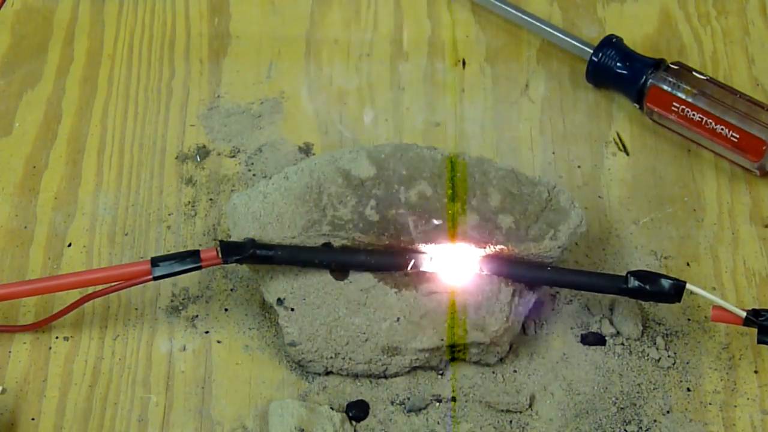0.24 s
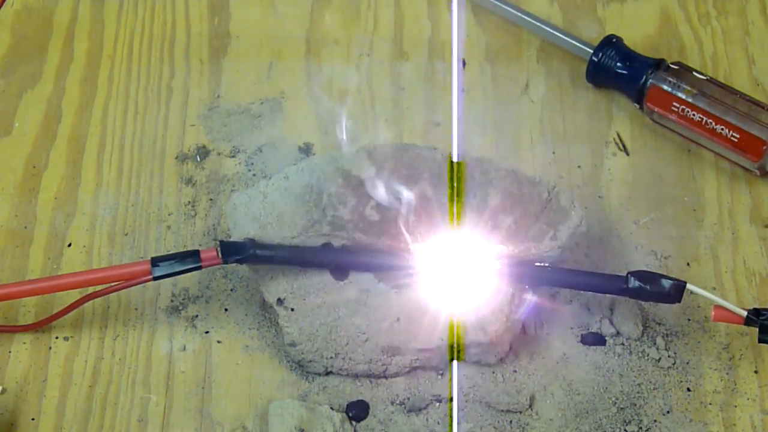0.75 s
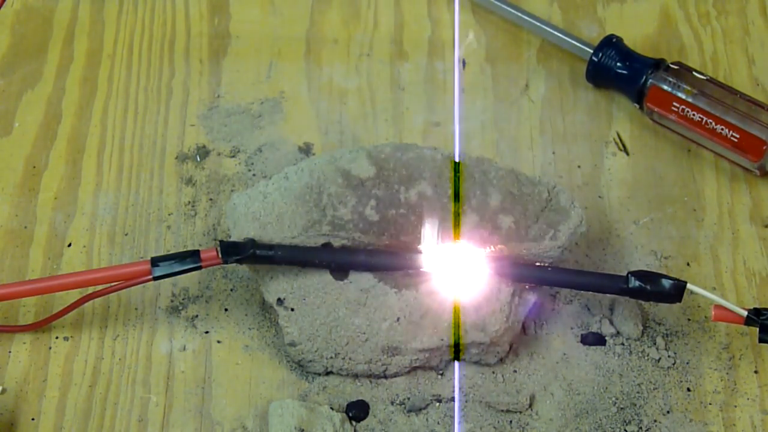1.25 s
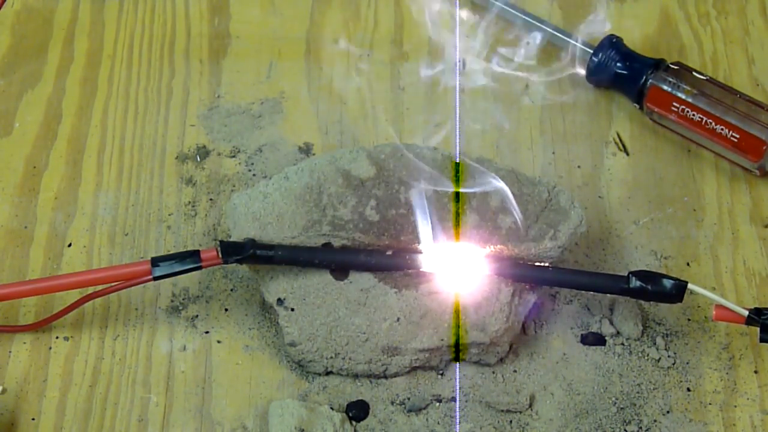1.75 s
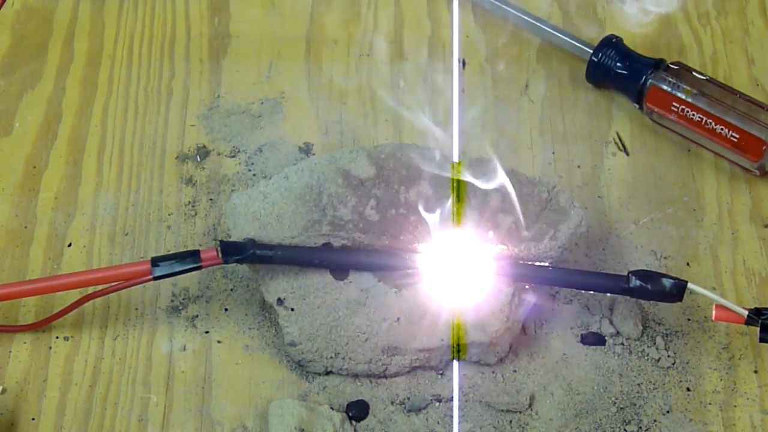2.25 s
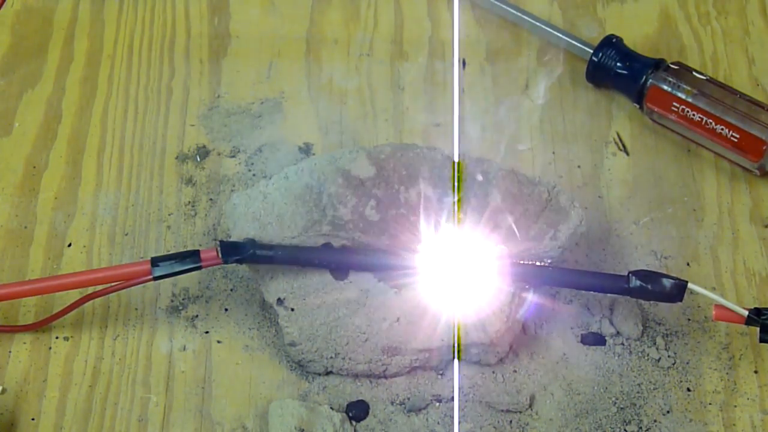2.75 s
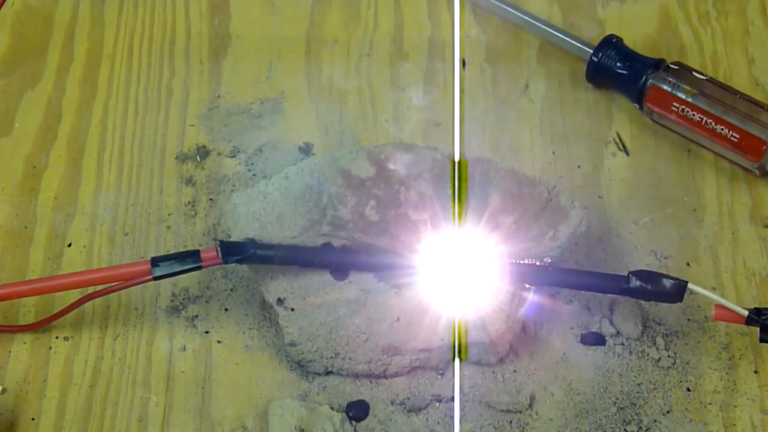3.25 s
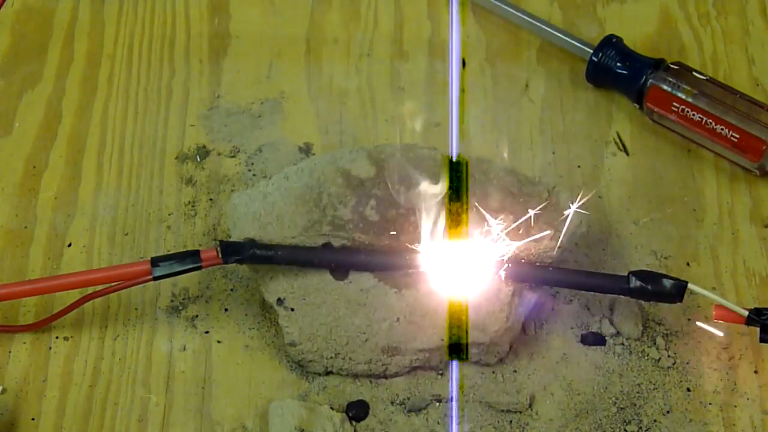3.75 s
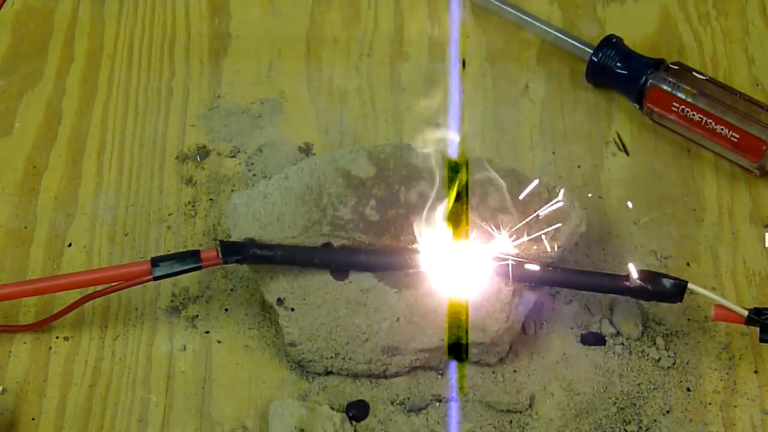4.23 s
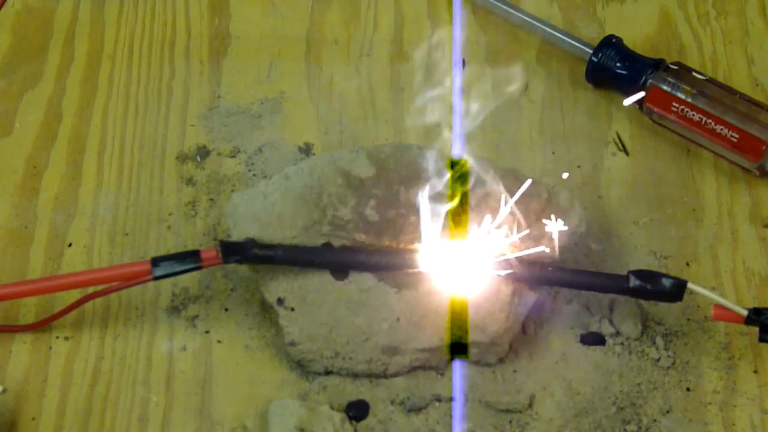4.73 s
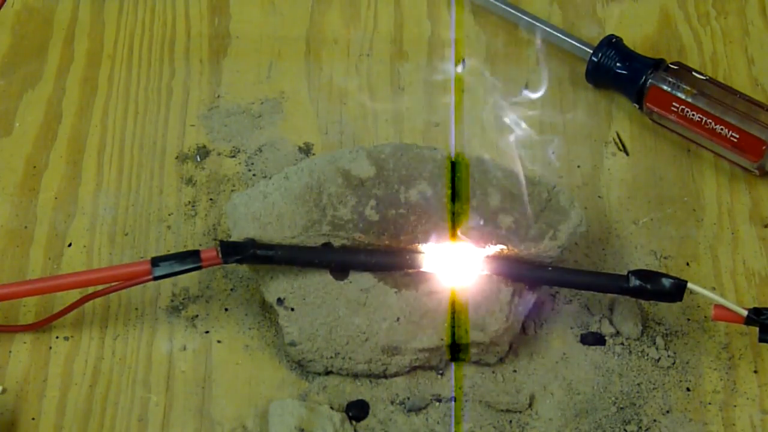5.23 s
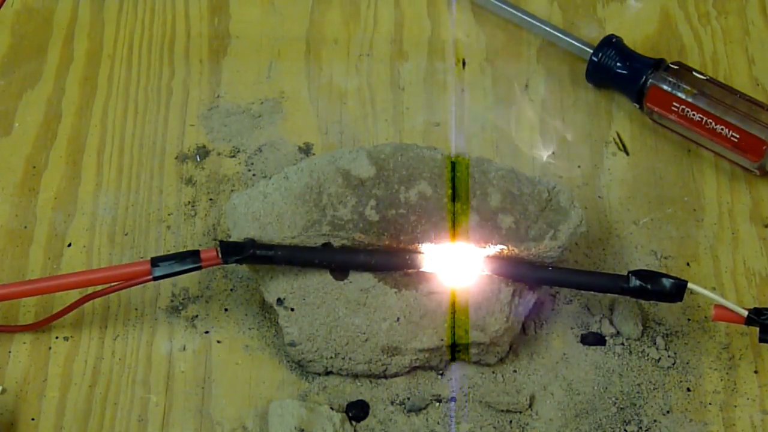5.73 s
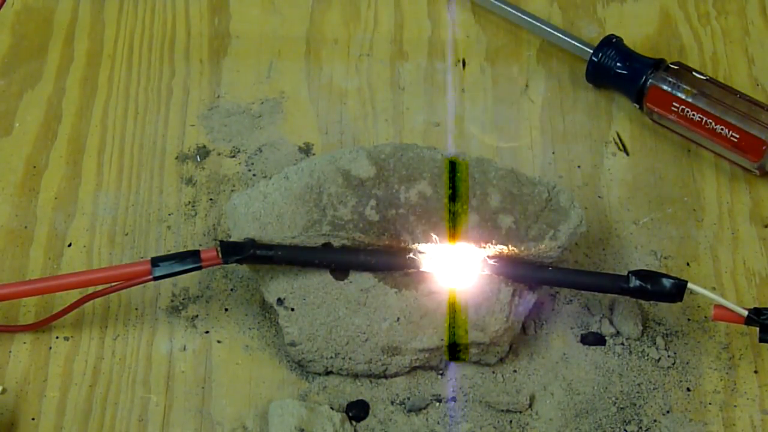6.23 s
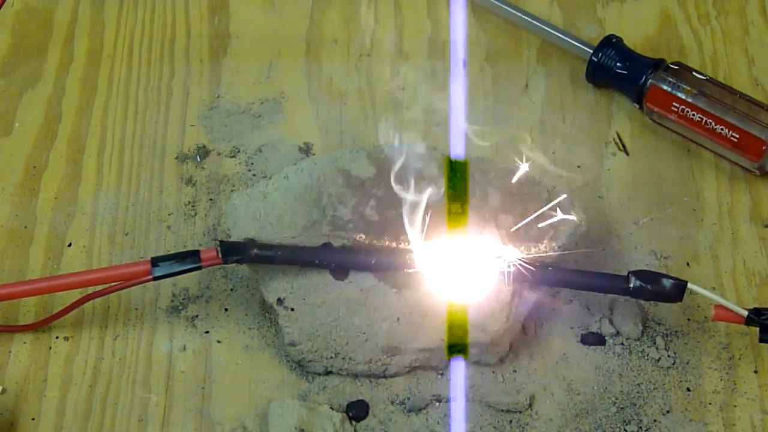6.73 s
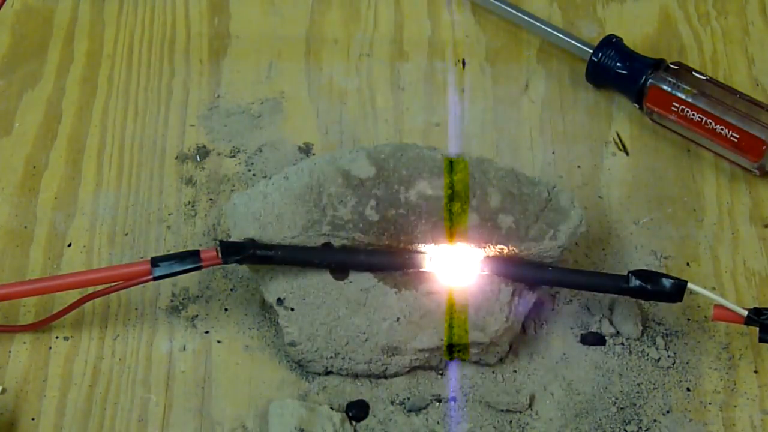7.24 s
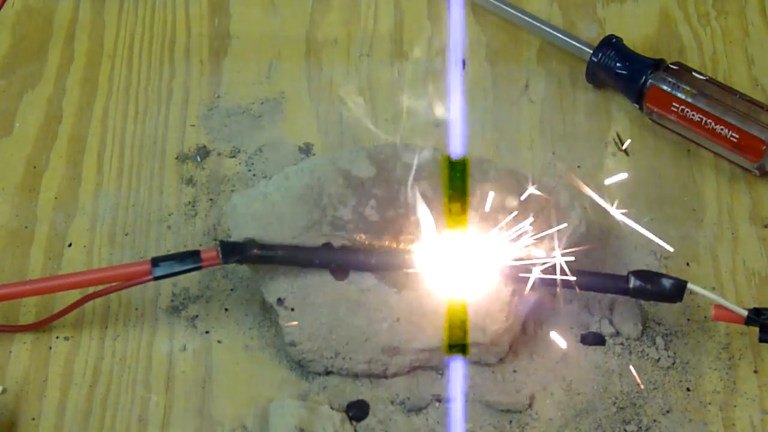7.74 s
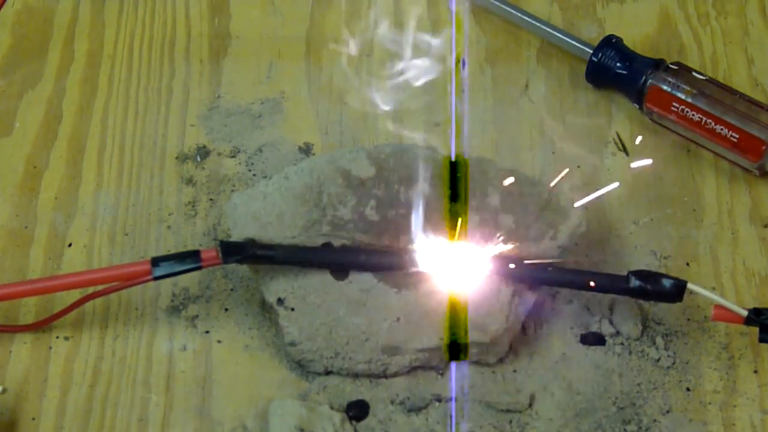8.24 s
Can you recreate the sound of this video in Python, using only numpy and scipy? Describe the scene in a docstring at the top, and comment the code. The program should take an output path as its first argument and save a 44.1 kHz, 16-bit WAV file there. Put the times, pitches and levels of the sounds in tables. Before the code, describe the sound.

Close stereo sound of an electric arc between carbon rods in a workshop. Short bright hisses burst out and die, then a quieter, grainy crackle with flares and snaps takes over. At about three and a half seconds a strong steady hiss breaks in, falters after five, and returns in longer bouts to the end. Soft puffs of hot gas and a faint low hum lie beneath.

```python
"""Electric arc on a workbench

A mains-fed arc between two carbon rods hisses when it runs hard, with more crackle when it calms.
Both are swarms of tiny random clicks; flares, spits and snaps of melting steel add brighter ones.
Soft puffs of hot gas and a flame murmur lie under it, with an unsteady hum, a drone and room noise.
The bench and workshop throw the arc's sound back to the two ports of a microphone."""
import sys
import numpy as np
from scipy import signal
from scipy.fft import rfft, irfft, next_fast_len
from scipy.io import wavfile
from scipy.ndimage import uniform_filter1d, map_coordinates

SR = 44100
rng = np.random.default_rng(int(sys.argv[2]) if len(sys.argv) > 2 else 0)


def file_out(sig):
    """Save sig as 16-bit WAV at sys.argv[1]."""
    # one column per channel
    cols = np.atleast_2d(sig).T
    # limit, then scale
    lim = np.clip(cols, -1, 1)
    pcm = np.round(lim * 32767).astype(np.int16)
    wavfile.write(sys.argv[1], SR, pcm)


N = 373968

PULSE_HZ = 120  # twice the mains rate
# rise and fall of the hum, which the flame's murmur shares:
# (time [s], level before each sound's own gain [dB])
HUM_LEVEL = [(0, -70), (0.7, -68.5), (1.3, -66), (1.5, -63.5), (2.3, -63.5), (3.42, -62), (3.58, -71),
             (3.9, -65.5), (4.25, -72), (5.1, -66), (5.98, -64), (6.2, -72), (7.1, -72), (8.48, -67.5)]


def amp(db):
    """Turn decibels into a gain."""
    return 10 ** (np.asarray(db) / 20)


def unit(x):
    """Scale a sound to an rms of 1."""
    return x / np.sqrt(np.mean(x ** 2) + 1e-20)


def along(points, hz):
    """Read (frequency [Hz], value) points on a log frequency axis."""
    f, v = np.transpose(points)
    return np.interp(np.log(hz + 1), np.log(f + 1), v)


def curve(rows):
    """Join (time [s], value) rows by straight lines, one value per sample."""
    return np.interp(np.arange(N) / SR, *np.transpose(rows))


def wobble(rate, size=128):
    """Wander smoothly through random values, `rate` of them a second."""
    at = np.arange(0, N + size, size)
    knots = rng.standard_normal(int(N * rate / SR) + 8)
    coarse = map_coordinates(knots, [at * rate / SR])
    return np.interp(np.arange(N), at, coarse)


def filtered(x, response):
    """Filter a sound by a response given as a function of frequency."""
    size = next_fast_len(N + SR // 2)
    hz = np.fft.rfftfreq(size, 1 / SR)
    return irfft(rfft(x, size) * response(hz), size)[..., :N]


def ping(spectrum, size=1024):
    """Make a click of energy 1 that has the given spectrum and nothing before its start."""
    hz = np.fft.rfftfreq(size, 1 / SR)
    cepstrum = irfft(np.log(amp(along(spectrum, hz))))
    # folding the second half onto the first packs the energy towards the start
    cepstrum[1:size // 2] *= 2
    cepstrum[size // 2 + 1:] = 0
    click = irfft(np.exp(rfft(cepstrum)))
    return click / np.linalg.norm(click)


def coloured(x, spectrum, size=1024):
    """Give a sound the colour of a spectrum by turning each sample into a ping."""
    return signal.oaconvolve(x, ping(spectrum, size=size))[:N]


def sparks(per_second, spread_db):
    """Scatter random clicks of uneven size and either sign, with a mean power of 1."""
    share = np.clip(per_second / SR, 1e-5, 1)  # chance of a click at each sample
    size_db = spread_db * np.clip(rng.standard_normal(N), -2, 2)
    size = amp(size_db) * rng.choice([-1, 1], N)
    return unit((rng.random(N) < share) * size / np.sqrt(share))


def arc(level_db):
    """Tiny discharges come in ragged clumps in a weak arc and merge to an even hiss in a strong one."""
    # colour of the merged discharges: (frequency [Hz], relative level [dB])
    hiss_colour = [(300, -52), (1500, -31.5), (2400, -30.5), (3300, -21), (4200, -17), (5000, -14.5),
                   (5600, -11.3), (6800, -7), (7950, -7), (8350, -3), (9000, 1), (10500, 1.7),
                   (12000, -0.5), (13700, 0.9), (15100, -3.5), (15800, -22)]
    # thinner, brighter colour of single discharges: (frequency [Hz], relative level [dB])
    crackle_colour = [(300, -35), (2400, -38), (4200, -16.5), (7500, -9.5), (9000, -1.5), (13500, 4),
                      (15800, -6.5)]
    hard = np.clip((level_db + 26) / 5, 0, 1)  # 0 = weak arc, 1 = strong arc
    restless_db = (1.3 - 0.81 * hard) * wobble(60)
    clumps_db = 2.0 * (1 - 0.4 * hard) * wobble(190, size=32)
    flicker_db = restless_db + clumps_db
    # the current peaks twice in each mains cycle
    throb = 1 + .07 * np.sin(2 * np.pi * PULSE_HZ * np.arange(N) / SR)
    hiss_gain = amp(level_db + flicker_db - 1.6 + 1.9 * hard) * throb
    hiss = hiss_gain * sparks(4500 + 30000 * hard, spread_db=3.5)
    # crackle makes up a larger share of the sound as the arc weakens
    crackle = amp(level_db + flicker_db - 3.6 - 5.4 * hard) * sparks(750, spread_db=6.5)
    return coloured(hiss, hiss_colour) + coloured(crackle + flares() + spits(), crackle_colour)


def strength():
    """The arc's level in dB is a simmer with bouts of hiss on top, broken where it falters."""
    # weaker arc under the bouts of hiss: (time [s], level [dB])
    simmer = [(0, -24), (0.9, -27), (1.5, -31), (1.9, -35.5), (2.19, -33.5), (2.23, -26.5), (2.9, -27),
              (3.5, -29.5), (4.7, -26.5), (5.5, -26), (5.8, -27), (6.02, -25.5), (6.95, -29.5), (7.5, -23),
              (8.48, -26.5)]
    power = amp(curve(simmer)) ** 2 + bouts()
    return 10 * np.log10(power) - falters()


def bouts():
    """The power of each bout of hiss rises fast, drifts and sputters while it holds, then dies away."""
    # bouts: (start [s], length [s], starting level [dB], sag [dB/s; negative = growth],
    # sputter [dB per unit of the random curve; negative = upside down])
    bout_rows = [(0.0, 0.11, -29.5, -45, 2), (0.197, 0.33, -18.5, 27, 1.7), (0.568, 0.094, -22.5, 20, 0.5),
                 (3.516, 1.014, -21, 0, 0.05), (4.958, 0.13, -26.5, -14, 1.6),
                 (6.021, 0.893, -20, 1.1, -0.4), (7, 0.11, -20.5, 0, 1.5), (7.146, 0.32, -17, 31, 0),
                 (7.524, 0.069, -22.5, 23, -0.5), (7.759, 0.66, -22, 5, 2.5)]
    attack_s, release_s = 0.012, 0.013
    t, power, sputter = np.arange(N) / SR, np.zeros(N), wobble(60)
    for start, length, db, sag, sputter_db in bout_rows:
        rise = np.clip((t - start) / attack_s, 0, 1)
        fall = np.exp(-np.clip(t - start - length, 0, 1) / release_s)
        held_db = db - sag * np.clip(t - start, 0, length) + sputter_db * sputter
        power += (rise * fall * amp(held_db)) ** 2
    return power


def falters():
    """The arc weakens for a moment along bell-shaped dips, returned as a depth in dB."""
    # dips: (centre [s], depth [dB; negative = a brief swell], half width [s])
    falter_rows = [(0.193, 6, 0.0095), (1.15, 4, 0.025), (2.25, 3, 0.014), (2.65, 5.5, 0.015),
                   (3.11, -1, 0.014), (3.38, 3, 0.02), (4.71, 2, 0.027), (4.895, 5.5, .018),
                   (5.349, 11, 0.015), (5.64, 21, 0.019), (5.672, 15, 0.012), (5.797, 8, 0.012),
                   (6.938, 2.5, 0.012), (7.135, 5, 0.0092), (8.132, 5.5, .012)]
    t = np.arange(N) / SR
    return sum(depth * np.exp(-((t - s) / width) ** 2) for s, depth, width in falter_rows)


def flares():
    """A flare is a swarm of thin discharges whose power swells and fades as a bell in time."""
    # flares: (peak time [s], level [dB], half width [s])
    flare_rows = [(0.1, -18, 0.0085), (0.63, -29, 0.017), (1.0, -22, 0.017), (1.28, -20, 0.04),
                  (2.39, -19.5, 0.035), (2.452, -20, .007), (2.537, -21, 0.022), (2.925, -21.5, 0.012),
                  (3.02, -21, 0.023), (3.175, -22.5, 0.0081), (3.24, -26, 0.015), (4.584, -19, 0.032),
                  (5.125, -17.5, 0.01), (5.225, -29, 0.0072), (5.272, -21, 0.0076), (5.462, -22.5, 0.032),
                  (5.583, -32, 0.0043), (5.70, -23.5, 0.012), (5.753, -24.5, 0.0059), (7.97, -16, 0.006)]
    t = np.arange(N) / SR
    power = sum(amp(db) ** 2 * np.exp(-((t - s) / width) ** 2) for s, db, width in flare_rows)
    return np.sqrt(power) * amp(1.9 * wobble(90)) * sparks(6000, spread_db=5.0)


def spits():
    """Melting steel spits in dense bursts of discharges that die quickly; a snap is a single big one."""
    # spits: (start [s], level before colouring [dB], length [s])
    spit_rows = [(0.204, -16.5, 0.0099), (1.826, -24.5, .013), (2.203, -16, 0.011), (2.26, -19, 0.012),
                 (3.3046, -16.5, 0.014), (3.4235, -16.5, 0.015), (3.517, -15, 0.015), (5.369, -22, 0.011),
                 (5.652, -16.5, 0.0029), (5.813, -12, 0.0067), (5.909, -13.5, 0.0051),
                 (7.15, -15.5, 0.0054)]
    # sharp snaps: (time [s], level before the shared lift below [dB])
    snap_rows = [(1.8374, -16), (2.213, -8), (2.2966, -13), (2.7717, -9), (3.3112, -10), (3.3549, -12),
                 (3.4208, -9), (3.4562, -13), (3.4945, -13), (3.5214, -5), (3.5457, -10), (5.369, -10),
                 (5.4746, -10), (5.539, -11), (5.654, -13), (5.6693, -11), (5.9144, -6)]
    bursts, snaps, t = np.zeros(N + SR), np.zeros(N), np.arange(SR // 8) / SR
    for s, db, length in spit_rows:
        rise = 1 - np.exp(-t / 0.00056)
        fall = np.exp(-(t / max(length, .002)) ** 3)
        bursts[round(s * SR):][:len(t)] += amp(db) * rise * fall
    for s, db in snap_rows:
        snaps[round(s * SR)] = amp(db + 9.5)  # strength at the arc, before it spreads
    return bursts[:N] * sparks(15000, spread_db=-1.0) + snaps


def scatter(t60, onset, size=16384):
    """Many small reflections blur into a dying stereo noise, alike in the bass, of energy 1 a side."""
    # how much of the scattered sound the ports share: (frequency [Hz], likeness [0 to 1])
    likeness = [(2000, 1), (4300, 0.85), (5500, 0.31), (14000, .02)]
    t, hz = np.arange(size) / SR, np.fft.rfftfreq(size, 1 / SR)
    turn = np.arccos(np.clip(along(likeness, hz), 0, 1)) / 2
    noise = rfft(rng.standard_normal((2, size)))
    mid, side = irfft(noise * [np.cos(turn), np.sin(turn)])
    # the noise falls 60 dB in t60 seconds and is silent up to the onset
    cloud = np.array([mid + side, mid - side]) * amp(-60 * t / t60) * (t > onset)
    return cloud / np.linalg.norm(cloud, axis=1, keepdims=True)


def workshop(x, echo_db, scatter_db, room_db, size=16384):
    """Direct sound meets close echoes that comb the hiss, scatter from the bench and a short room tail."""
    # bench and nearby things at each port:
    # (delay [ms], strength before the echo gain [ratio; negative = inverted])
    left_echoes = [(1.283, -0.05), (1.506, 0.07), (2.255, 0.08), (2.375, 0.11), (2.451, -0.05),
                   (2.717, -0.04), (2.957, -0.07), (3.52, 0.05), (3.804, 0.12), (4.409, 0.04),
                   (4.908, 0.12), (5.154, 0.11), (5.41, 0.12), (5.574, 0.11), (5.849, 0.06), (6.527, -0.1),
                   (6.848, -0.07), (9.965, 0.06)]
    right_echoes = [(1.313, 0.08), (1.428, 0.1), (1.584, -0.1), (1.795, 0.07), (2.247, 0.09), (2.371, 0.13),
                    (2.459, -0.06), (3.09, 0.08), (3.414, -0.08), (3.718, -0.06), (3.808, 0.08),
                    (5.022, -0.09), (5.146, 0.16), (5.599, 0.09), (6.528, -0.14), (6.728, -0.08),
                    (7.168, -0.06), (8.483, -0.06)]
    hz = np.fft.rfftfreq(size, 1 / SR)

    def bounce(rows):
        """Each echo is a delayed copy, so it turns the phase in step with frequency."""
        return sum(g * np.exp(-2j * np.pi * hz * ms / 1000) for ms, g in rows)

    echoes = np.array([bounce(left_echoes), bounce(right_echoes)])
    answer = irfft(1 + amp(echo_db) * echoes)
    answer = answer + amp(scatter_db) * scatter(t60=0.065, onset=0.0054)
    answer = answer + amp(room_db) * scatter(t60=0.25, onset=0.012)
    answer = answer / np.linalg.norm(answer, axis=1, keepdims=True)
    return signal.oaconvolve(x[None], answer, axes=1)[:, :N]


def gas(level_db):
    """Hot gas flutters in soft puffs that partly follow the arc, over a flame murmur that follows the hum."""
    # flutter over the melt: (time [s], level before the gain below [dB])
    flutter_level = [(0.0, -49.5), (0.65, -52.5), (1.2, -58.5), (1.28, -50.5), (1.39, -58), (2.1, -57),
                     (2.62, -55.5), (2.93, -50), (3.9, -54.5), (4.27, -57.5), (4.54, -54.5), (4.6, -60.5),
                     (5.01, -51.5), (5.3, -53), (5.35, -59.5), (5.38, -51), (5.69, -51), (6.02, -45),
                     (6.19, -55), (6.78, -51.5), (6.99, -54.5), (7.01, -50.5), (7.8, -52), (8.48, -56)]
    # puffs as coloured by the brick and bench: (frequency [Hz], relative level [dB])
    puff_colour = [(25, -24), (75, -7), (200, -10), (410, 2), (565, -3.5), (680, -1), (760, 11),
                   (860, -0.5), (970, 3), (1150, -5), (1350, 8), (1530, -1), (1750, 2), (2400, -5),
                   (3700, 6), (6000, -7.5)]
    # murmur of the flame: (frequency [Hz], relative level [dB])
    murmur_colour = [(40, -35), (78, 0), (125, -8), (200, -6.5), (265, -3.5), (320, -10.5), (600, -48)]
    puffs = coloured(amp(1.8 * wobble(40)) * sparks(3000, spread_db=2.5), puff_colour)
    # quick changes of the arc against its average over 0.25 s
    surge_db = level_db - uniform_filter1d(level_db, int(0.25 * SR))
    flutter = amp(curve(flutter_level) + 4.5 + 0.25 * surge_db) * unit(puffs)
    murmur = coloured(rng.standard_normal(N), murmur_colour, size=4096)
    # the murmur swells with the hum, but more widely
    calm_db = curve(HUM_LEVEL) - curve(HUM_LEVEL).mean()
    return flutter + amp(-68.5 + 1.13 * calm_db) * unit(murmur)


def tones(lines, waver, flutter_db=2.5):
    """Add up sine tones, each wandering slightly in phase (waver, in radians) and level."""
    t, total = np.arange(N) / SR, np.zeros(N)
    for hz, db in lines:
        level = np.sqrt(2) * amp(db + flutter_db * wobble(6))
        total += level * np.sin(2 * np.pi * hz * t + waver * wobble(7.4))
    return total


def hum():
    """Unsteady tones hum and throb over a low drone in the workshop."""
    # steady hum tones, then the drone's: (frequency [Hz], relative level [dB])
    hum_tones = [(177, -1.5), (240, -3), (360, -0.5), (480, -4.5), (960, -3.5)]
    drone_tones = [(54, 6.5), (146.5, -14), (211, -3)]
    # throb at twice the mains rate, then the drone: (time [s], level before the gain below [dB])
    throb_level = [(0.0, -68), (0.68, -85), (1.16, -71), (4.08, -66.5), (4.23, -79), (5.2, -62),
                   (5.34, -76), (5.72, -64), (6.42, -74), (6.61, -88), (6.75, -67), (7.68, -74),
                   (8.12, -63), (8.48, -73)]
    drone_level = [(0.0, -77), (2.38, -75), (3.28, -62), (4.18, -70), (5.24, -64), (5.29, -68), (6.75, -79),
                   (7.13, -64.5), (7.2, -75), (7.79, -66), (7.96, -80), (8.48, -63)]
    humming = amp(curve(HUM_LEVEL) - 3.5) * tones(hum_tones, waver=0.47, flutter_db=1.5)
    throb = amp(curve(throb_level) - 1.5) * tones([(PULSE_HZ, 0)], waver=0.72, flutter_db=1.4)
    drone = amp(curve(drone_level) - 5.5) * tones(drone_tones, waver=.5, flutter_db=2.5)
    return humming + throb + drone


def air():
    """Faint room noise is filtered random noise, different at each port."""
    # colour of the room noise: (frequency [Hz], relative level [dB])
    air_colour = [(25, -17), (70, -6), (400, -4), (1000, -8), (2000, -22), (8000, -17)]
    noise = rng.standard_normal((2, N))
    return amp(-75.0) * np.array([coloured(side, air_colour, size=4096) for side in noise])


def scene():
    """The arc is slightly louder on the right; gas and hum reach both ports alike."""
    # lead of the left port over the right: (frequency [Hz], phase [radians])
    port_phase = [(5000, 0), (9000, 0), (12000, 0.93), (13800, 1), (15500, .4)]
    level_db = strength()
    wet = workshop(arc(level_db), echo_db=3.0, scatter_db=-3.0, room_db=-8.5)
    # the two ports part in phase in the treble, half the lead each way
    halves = .5j * np.array([[1], [-1]])
    wet = filtered(wet, lambda hz: np.exp(halves * along(port_phase, hz)))
    return wet * amp([[.3], [1.1]]) + gas(level_db) + hum() + air()


def record(dry):
    """The microphone weakens a few narrow bands and keeps nothing above its band limit."""
    # weakened bands: (centre [Hz], width [Hz], depth [dB])
    notches = [(2620, 260, 29), (4645, 235, 32), (7950, 220, 7)]
    top_hz = 15850

    def response(f):
        """Bell-shaped dips, then a 200 Hz slope down to silence at the limit."""
        dips_db = sum(depth * np.exp(-(2 * (f - c) / w) ** 2) for c, w, depth in notches)
        return amp(-dips_db) * np.clip((top_hz - f) / 200, 0, 1)

    return filtered(dry, response)


dry = scene()
out = record(dry)
file_out(out)
```